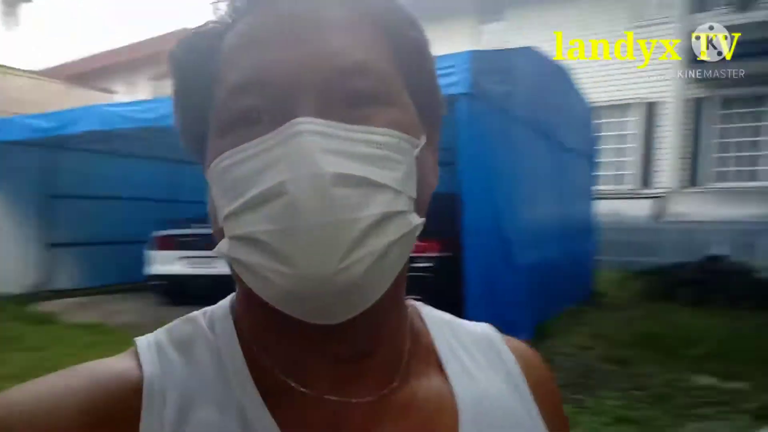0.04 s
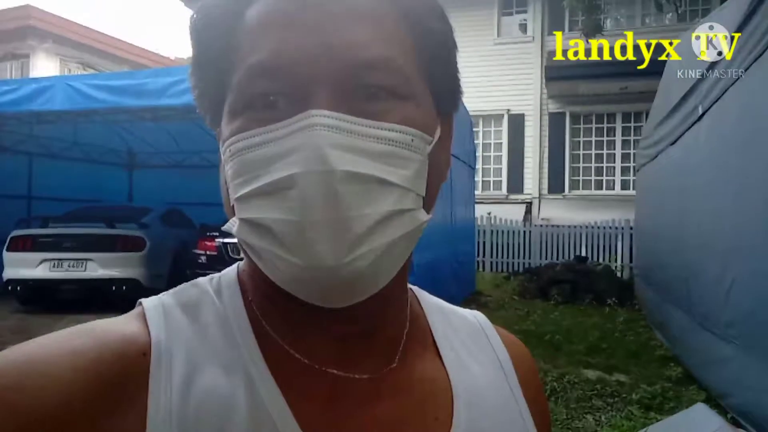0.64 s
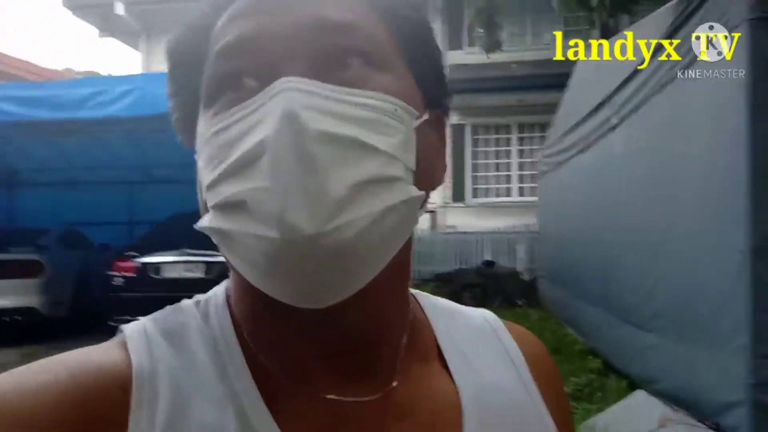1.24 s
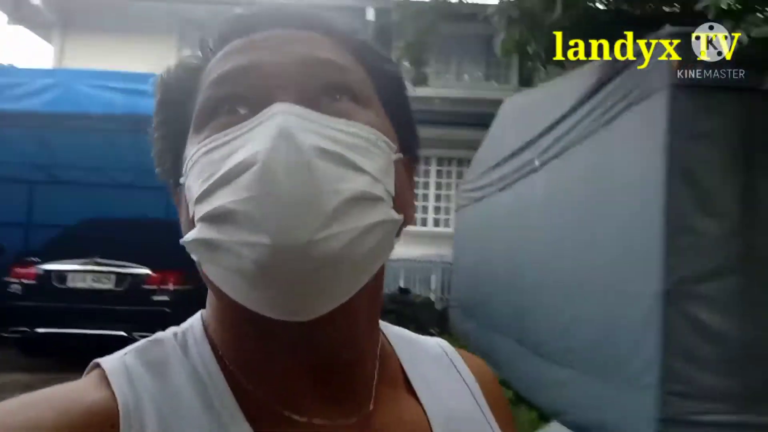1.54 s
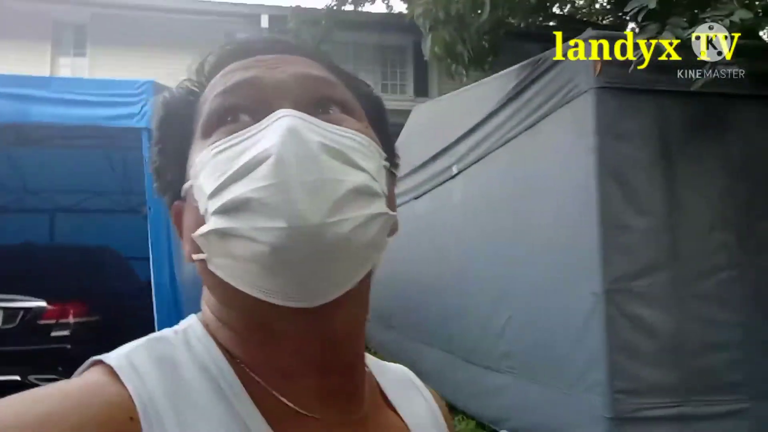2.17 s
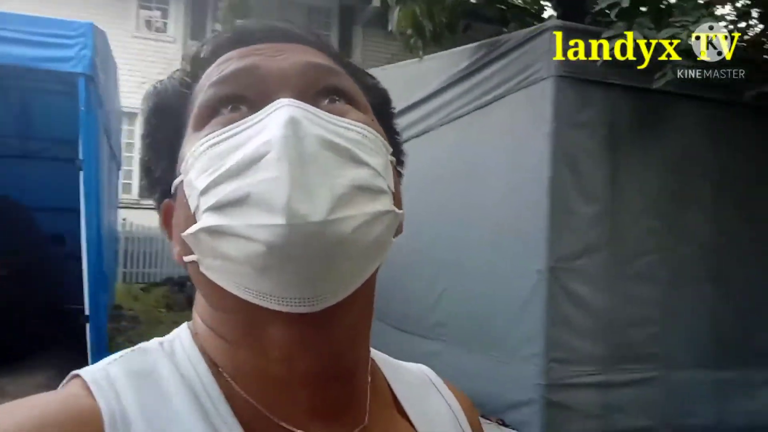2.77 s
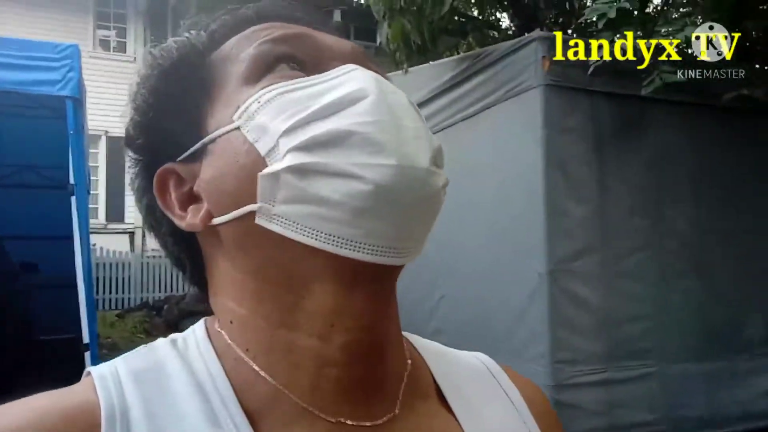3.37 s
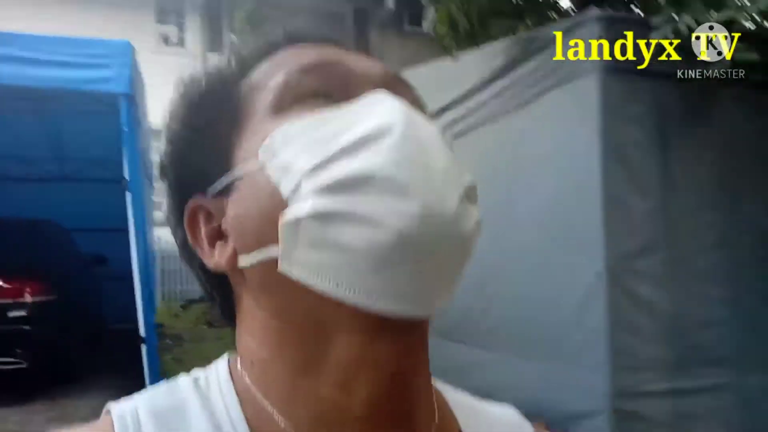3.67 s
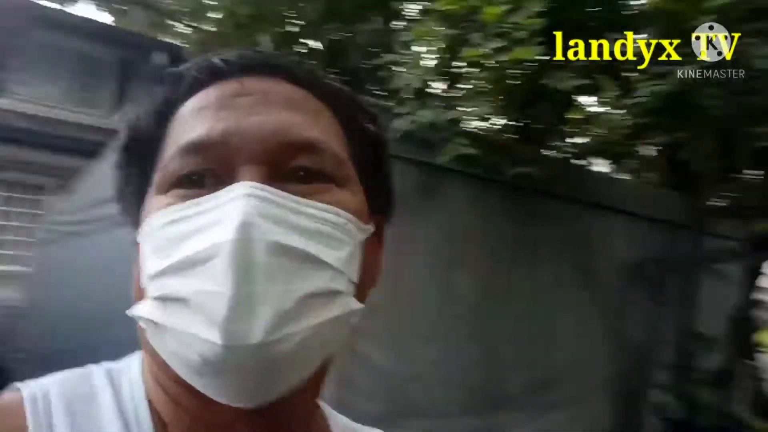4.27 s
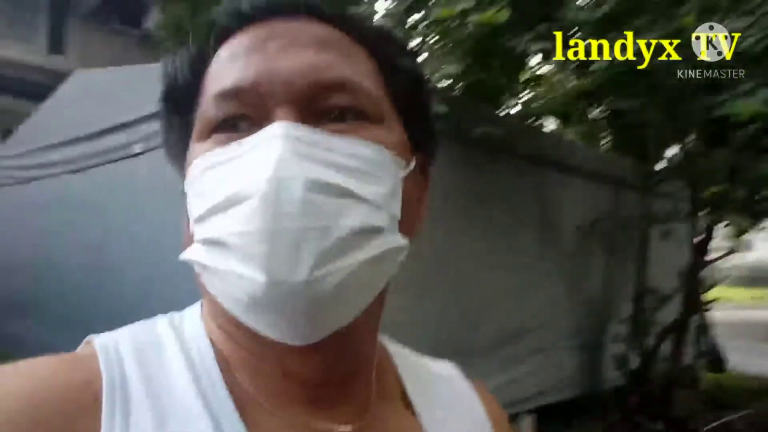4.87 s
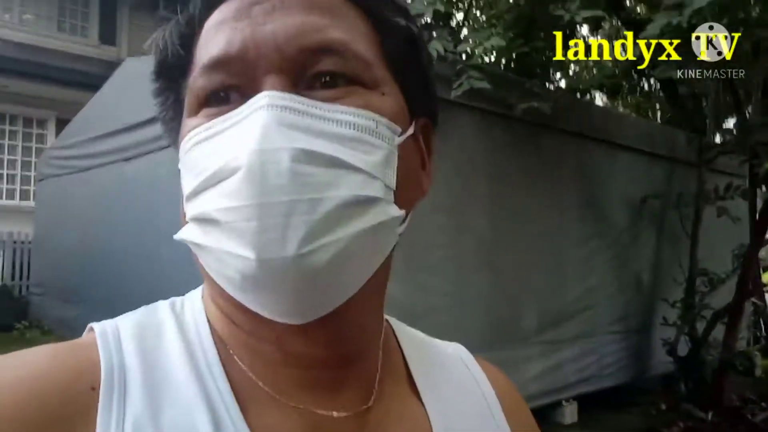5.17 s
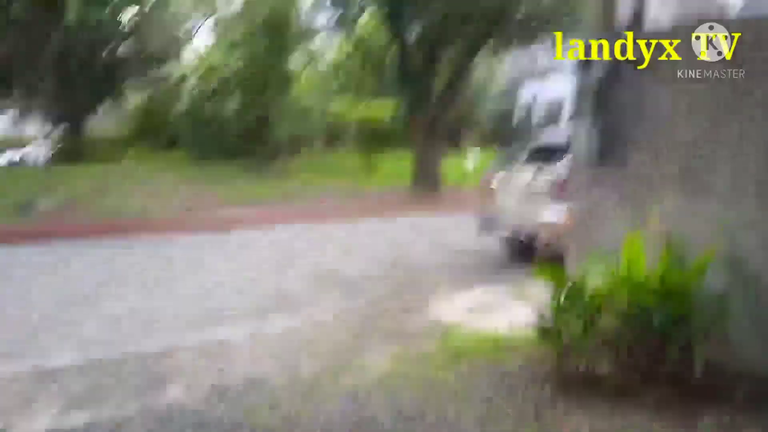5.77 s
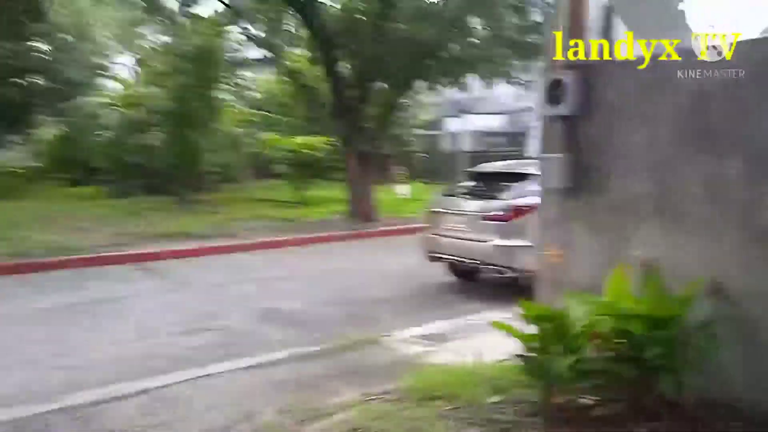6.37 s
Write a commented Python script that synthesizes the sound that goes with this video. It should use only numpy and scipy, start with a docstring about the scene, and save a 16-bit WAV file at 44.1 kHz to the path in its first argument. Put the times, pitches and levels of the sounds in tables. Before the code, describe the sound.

In a quiet yard a bird whistles a loud two-note call: a quick dip and rise, then a longer scoop that flicks up. Far birds chirp and a distant engine swells once, while small ticks and cloth rustles sound close to the handheld microphone. The call comes twice more, the background draining away under the last. After a moment of silence, soft street noise fades in with a thin high tone.

```python
"""Over the haze of a quiet yard a bird whistles a two-note call: a quick dip and rise, then a long scoop that
flicks up. Far birds chirp and a far engine swells once, while small ticks, crinkles and rustles sound close by
as someone walks with the microphone in hand. The call comes again; the yard drains away under a third. After a
moment of silence a street fades in, with a brief thin high tone and two last rustles."""
import sys
import numpy as np
from scipy import signal
from scipy.fft import rfft, irfft, next_fast_len
from scipy.io import wavfile
from scipy.ndimage import uniform_filter1d

SR = 44100
rng = np.random.default_rng(int(sys.argv[2]) if len(sys.argv) > 2 else 0)


def wrap_up_sound(samples):
    """Save the sound to the file named by the first command line argument, as 16-bit audio."""
    columns = np.atleast_2d(samples).T
    # keep every value between -1 and 1, then stretch to whole-number steps
    tamed = np.clip(columns, -1, 1)
    steps = np.round(tamed * 32767).astype(np.int16)
    wavfile.write(sys.argv[1], SR, steps)


N = 282943
TIME = np.arange(N) / SR
CUTOFF_HZ = 15500


def from_db(db):
    """Decibels to gain."""
    return 10 ** (np.asarray(db) / 20)


def rms_one(x):
    """Scale to unit rms."""
    return x / np.sqrt(np.mean(x ** 2) + 1e-20)


def ramp(x):
    """Smooth step from 0 to 1 as x goes from 0 to 1."""
    return np.sin(np.pi / 2 * np.clip(x, 0, 1)) ** 2


def swell(peak_s, length_s, db):
    """Bell-shaped gain envelope."""
    return from_db(db) * np.exp(-(2 * (TIME - peak_s) / length_s) ** 2)


def drift(rate_hz):
    """Smooth random wander of unit spread."""
    pole = np.exp(-2 * np.pi * rate_hz / SR)
    wander = signal.lfilter([1], [1, -2 * pole, pole * pole], rng.standard_normal(N + SR))
    return rms_one(wander[SR:])


def glide(points, t):
    """Smooth curve through (time, value) points, flat at each turn."""
    times, value = np.transpose(points)
    step = np.diff(times)
    slope = np.diff(value) / step
    inner_tangent = 2 * np.maximum(slope[:-1] * slope[1:], 0) / (slope[:-1] + slope[1:])
    tangent = np.r_[slope[0], inner_tangent, slope[-1]]
    k = np.searchsorted(times[1:-1], t)
    progress = np.clip((t - times[k]) / step[k], 0, 1)
    bend = (1 - progress) * (tangent[k] - slope[k]) - progress * (tangent[k + 1] - slope[k])
    return value[k] + step[k] * progress * (slope[k] + (1 - progress) * bend)


def haze(colour):
    """Unit noise shaped by an EQ curve of (Hz, dB) points."""
    hz, db = np.transpose(colour)
    size = next_fast_len(N)
    bin_hz = np.maximum(np.arange(size // 2 + 1) * SR / size, 1)
    gain = from_db(np.interp(np.log(bin_hz), np.log(hz), db))
    return rms_one(irfft(rfft(rng.standard_normal(size)) * gain, size)[:N])


def narrow_noise(hz, width_hz):
    """Unit noise in one narrow band."""
    band = signal.butter(2, [hz - width_hz / 2, hz + width_hz / 2], "band", fs=SR, output="sos")
    return rms_one(signal.sosfilt(band, rng.standard_normal(N)))


def foliage(x, t60_s, predelay_s):
    """Leaves and walls scatter a short diffuse tail."""
    t = TIME[:SR // 4]
    scatter = rng.standard_normal(len(t)) * from_db(-60 * t / t60_s) * (t > predelay_s)
    return signal.fftconvolve(x, scatter / np.linalg.norm(scatter))[:N]


def yard(level_db=-47, fade_from_s=5.405, fall_db_per_s=208.5):
    """A steady bed of distant town noise that drains away as the last call begins."""
    # colour of the yard haze: (frequency [Hz], level [dB])
    colour = [(25, -27), (38, -16), (60, -1.5), (120, 0), (190, -5.5), (280, -4), (550, -13), (1350, -14),
              (2500, -16), (3700, -25.5), (6000, -30), (8000, -37), (11500, -49), (15000, -49)]
    fall_db = fall_db_per_s * np.maximum(TIME - fade_from_s, 0)
    return from_db(level_db - fall_db + .5 * drift(8)) * haze(colour)


def far_engine(hum_hz=136, wobble=0.033, throb_db=3.0):
    """A far engine swells once, its hum wavering in pitch and level."""
    pitch = hum_hz * (1 + wobble * drift(13.4))
    hum = rms_one(np.sin(2 * np.pi * np.cumsum(pitch) / SR))
    return swell(peak_s=2.02, length_s=0.72, db=-47.5) * from_db(throb_db * drift(3.5)) * hum


def street(start_s=5.965, fade_s=0.16, traffic_db=-40, tone_attack_s=0.086, tone_t60_s=1.2):
    """Traffic haze fades in, and a thin high tone dies away over it."""
    # colour of the traffic haze: (frequency [Hz], level [dB])
    colour = [(25, -28.5), (70, -4.5), (170, 1.5), (300, -2.5), (520, -12), (1200, -7), (2300, -15.5),
              (3700, -25), (5000, -24), (7000, -31), (9000, -40), (12000, -54), (15000, -48)]
    age = np.maximum(TIME - start_s, 0)
    traffic = from_db(traffic_db) * np.minimum(age / fade_s, 1) ** 1.03 * haze(colour)
    tone_envelope = from_db(-49.5 - 60 * age / tone_t60_s) * ramp(age / tone_attack_s)
    return traffic + tone_envelope * narrow_noise(hz=4260, width_hz=60)


def far_birds(count=16, from_s=1.25, to_s=3.7, loose_s=0.031, chirp_s=0.046, chirp_db=-52.5):
    """Small rising chirps, each a little different and blurred by distance, over a swelling chorus."""
    chirps, size = np.zeros(N), int(chirp_s * SR)
    sweep_hz = np.linspace(2570, 2930, size)
    phase = 2 * np.pi * np.cumsum(sweep_hz) / SR
    envelope = np.sqrt(np.hanning(size))
    for onset_s in np.linspace(from_s, to_s, count):
        late, sharp, loud = rng.standard_normal(size=3)
        at = round((onset_s + loose_s * late) * SR)
        chirp = envelope * np.sin(phase * (1 + .04 * sharp))
        chirps[at:at + size] += from_db(chirp_db + 2 * loud) * chirp
    chorus_level = swell(peak_s=2.69, length_s=2.8, db=-57.5) * from_db(2.6 * drift(23))
    chorus = chorus_level * narrow_noise(hz=2804, width_hz=660)
    blur = from_db(-2) * foliage(chirps, t60_s=0.14, predelay_s=0.021)
    return chirps + blur + chorus


def cloth_rustles(grain_db=4.5):
    """Cloth slides in short grainy swells."""
    # slides of the cloth: (peak time [s], length [s], level [dB])
    slides = [(1.869, 0.046, -46), (2.205, 0.048, -47.5), (2.865, 0.12, -47), (6.128, 0.16, -45),
              (6.355, 0.023, -47.5)]
    # colour of the rubbing cloth: (frequency [Hz], level [dB])
    colour = [(100, 4), (900, 3.5), (2500, 10), (4000, -1), (6000, 1), (9000, -12.5), (15000, -27)]
    friction = rms_one(haze(colour) * from_db(grain_db * drift(250)))
    return sum(swell(*slide) for slide in slides) * friction


def crinkle_spell(count=8):
    """A spell of tiny bright crinkles at random: (time [s], level [dB], lowest resonance [Hz])."""
    return list(rng.uniform(low=(1.78, -50, 5160), high=(2.4, -44, 9400), size=(count, 3)))


def close_ticks(shortest_rise_s=0.00019, lowpass_hz=10000):
    """Each tick, a soft low contact or a bright high crinkle, rings two modes that swell and die within a few
    cycles."""
    # the clearest ticks: (time [s], level [dB], lowest resonance [Hz])
    contacts = [(.225, -29, 1400), (0.274, -34, 1300), (.317, -32, 1440), (2.022, -41.5, 7700),
                (2.199, -32, 2120), (2.202, -32, 8950), (2.512, -32, 2880), (2.569, -36.5, 2900),
                (2.829, -36.5, 925), (2.875, -36, 1200), (2.920, -36, 2000), (3.793, -25.5, 1384),
                (4.2131, -36.5, 1320), (4.2396, -31.5, 1440), (4.2955, -30, 2350), (5.234, -39, 1250)]
    # modes of a tick: (ratio to the lowest resonance, level [dB], rise to the peak [cycles])
    modes = [(1, 1, 1.22), (1.9, -1.5, 1.06)]
    ticks, t = np.zeros(N), TIME[:SR // 50]
    for onset_s, db, lowest_hz in contacts + crinkle_spell():
        at = round(onset_s * SR)
        for ratio, mode_db, cycles in modes:
            hz = lowest_hz * ratio
            if hz < CUTOFF_HZ:
                age = t / max(cycles / hz, shortest_rise_s)
                envelope = (age * np.exp(1 - age)) ** 2
                ticks[at:at + len(t)] += from_db(db + mode_db) * envelope * np.sin(2 * np.pi * hz * t)
    return signal.sosfilt(signal.butter(6, lowpass_hz, fs=SR, output="sos"), ticks)


def whistle_note(contour, start_s, gain_db, attack_s=0.024, release_s=0.014, jitter=0.003, rough=0.048):
    """A nearly pure whistle: the octave shows on its lowest pitches; the tone roughens on its highest."""
    # throat resonance, which makes loudness follow pitch: (frequency [Hz], level [dB])
    throat = [(2170, -18), (2550, -8), (2800, -4), (3050, 0), (3350, -1.5), (3650, 0.8), (4250, 0),
              (5150, -19.5)]
    # second, third and fourth harmonic against the fundamental: (level [dB])
    overtones = [-45, -41.5, -47.5]
    t = TIME - start_s
    pitch = glide(contour, t) * (1 + jitter * drift(360))
    phase = 2 * np.pi * np.cumsum(pitch) / SR
    envelope = ramp((t - contour[0][0]) / attack_s) * ramp((contour[-1][0] - t) / release_s)
    level = envelope * from_db(gain_db + np.interp(pitch, *np.transpose(throat)))
    lowness = np.clip((2480 - pitch) / 200, 0, 1)
    highness = np.clip((pitch - 3650) / 700, 0, 1)
    tone = np.sin(phase) * (1 + rough * highness * drift(900))
    tone += from_db(-12) * lowness * np.sin(2 * phase)
    for harmonic, overtone_db in enumerate(overtones, 2):
        rolloff = 1 / (1 + (harmonic * pitch / 11500) ** 12)
        flutter_db = drift(45)
        tone += from_db(overtone_db + flutter_db) * rolloff * np.sin(harmonic * phase)
    return level * tone


def bird(call_s=0.346, hiss_db=-57.5, wall_delay_s=0.033):
    """Three calls with faint hiss, scatter from nearby leaves, a longer tree tail and a wall echo."""
    # starts of the calls: (time [s])
    starts = [0.0033, 3.0219, 5.46]
    # first note, a quick dip and rise: (time into the call [s], pitch [Hz])
    dip = [(0.008, 2300), (0.022, 3070), (0.033, 2730), (0.044, 2180), (0.054, 2800), (0.064, 3410),
           (0.081, 3660), (0.092, 3600), (0.1, 3200)]
    # second note, a long scoop that flicks up: (time into the call [s], pitch [Hz])
    scoop = [(0.13, 2800), (0.141, 3320), (0.163, 3065), (0.188, 2725), (0.218, 2555), (0.272, 2955),
             (0.297, 3530), (0.3125, 4190), (0.3205, 5150), (0.331, 3900)]
    # colour of the hiss under each call: (frequency [Hz], level [dB])
    hiss_colour = [(30, 1), (150, -2), (1000, -17.5), (2000, -9), (5000, -12.5), (8300, -18), (12000, -21),
                   (15500, -25.5)]
    whistle, calling = np.zeros(N), np.zeros(N)
    for start in starts:
        whistle += whistle_note(dip, start, gain_db=-12.5) + whistle_note(scoop, start, gain_db=-12)
        calling += (TIME > start + .01) & (TIME < start + call_s)
    hiss = from_db(hiss_db) * uniform_filter1d(calling, SR // 25) * haze(hiss_colour)
    leaves = from_db(-23) * foliage(whistle, t60_s=.07, predelay_s=.004)
    trees = from_db(-31) * foliage(whistle, t60_s=.17, predelay_s=.002)
    wall = from_db(-39) * np.interp(TIME - wall_delay_s, TIME, whistle)
    return whistle + leaves + trees + wall + hiss


def scene(silence_at_s=5.835):
    """Mono mix: the birds over the yard, a moment of silence, then the street."""
    yard_mix = bird() + far_birds() + yard() + far_engine() + close_ticks()
    fade_out = ramp((silence_at_s - TIME) / .01)
    return (fade_out * yard_mix + street() + cloth_rustles())[None]


def record(dry):
    """A steep low-pass takes off the very top."""
    return signal.sosfilt(signal.ellip(12, .1, 80, CUTOFF_HZ, fs=SR, output="sos"), dry)


dry = scene()
out = record(dry)
wrap_up_sound(out)
```